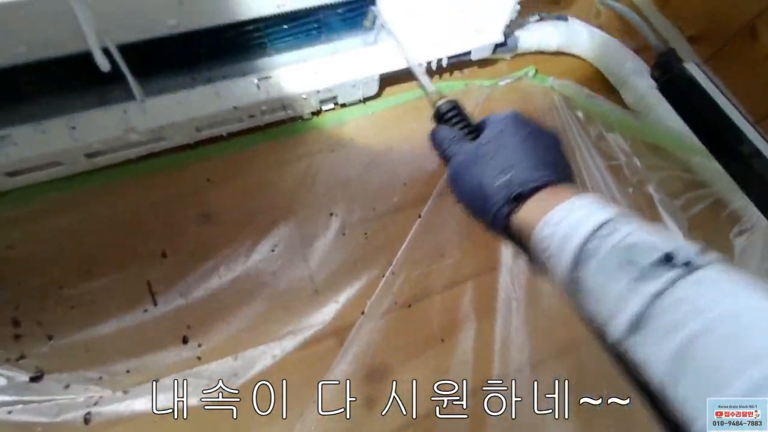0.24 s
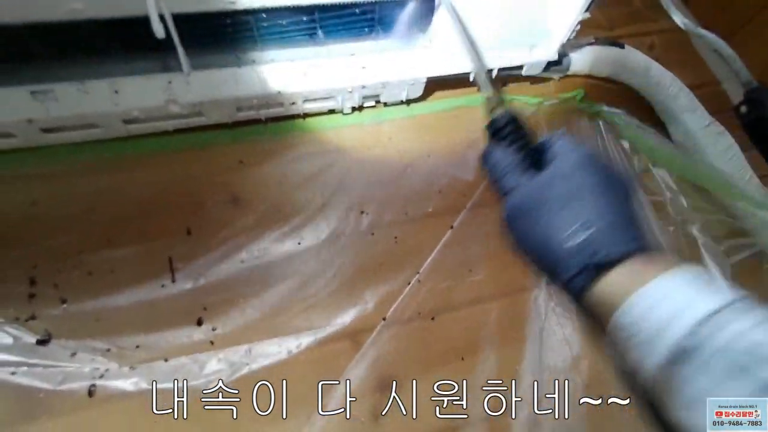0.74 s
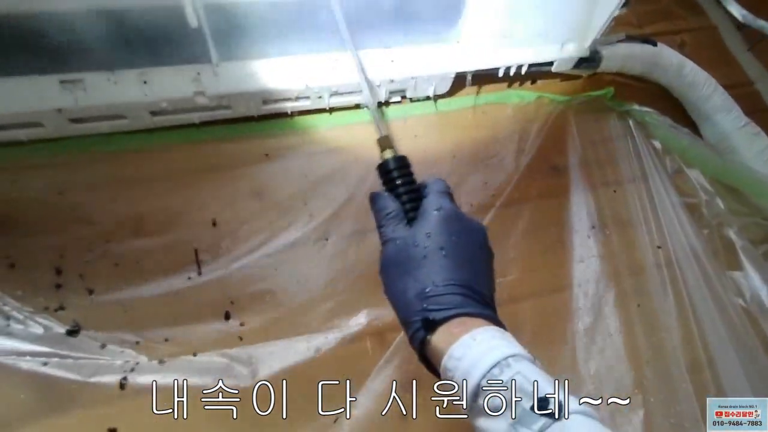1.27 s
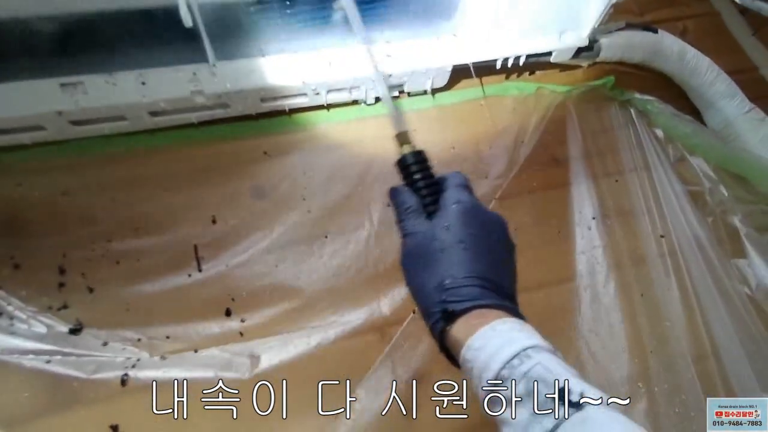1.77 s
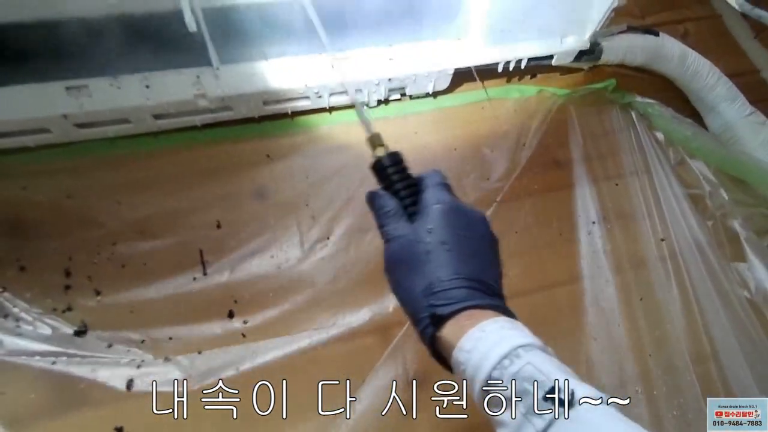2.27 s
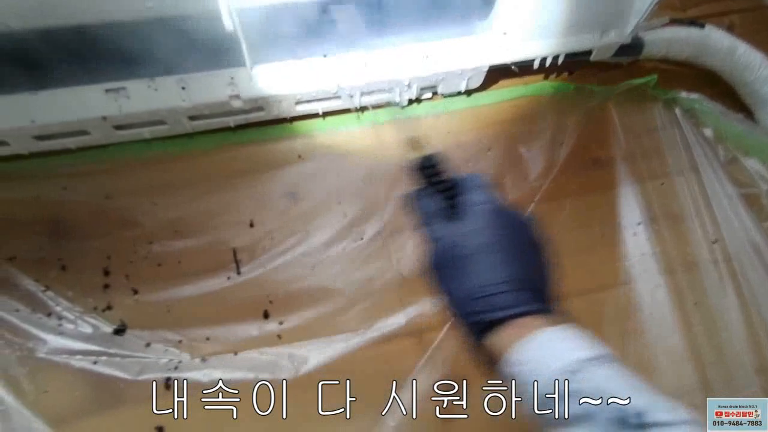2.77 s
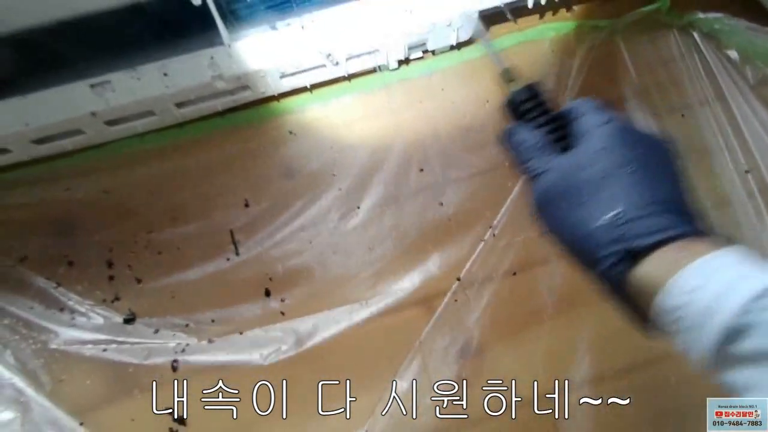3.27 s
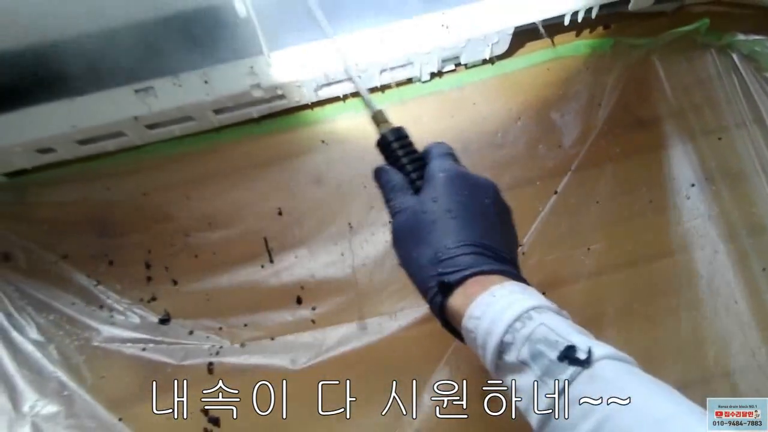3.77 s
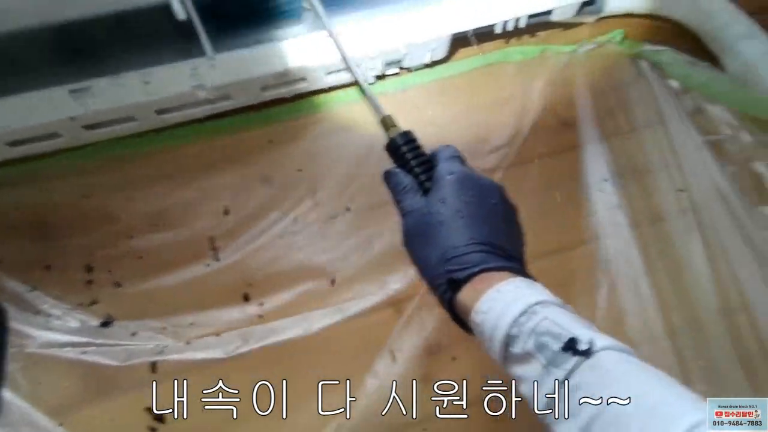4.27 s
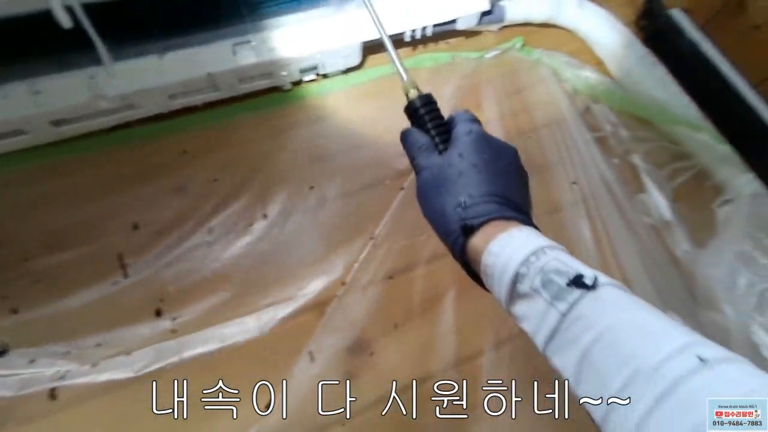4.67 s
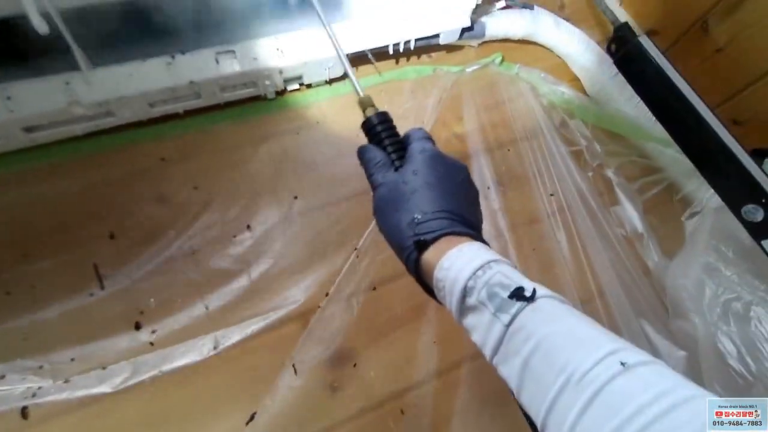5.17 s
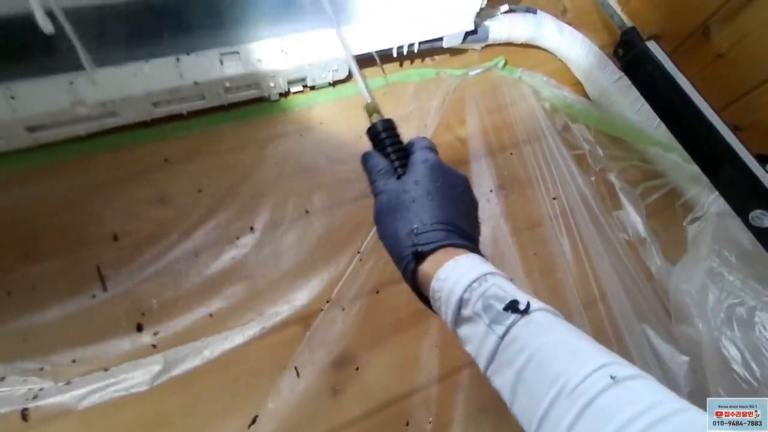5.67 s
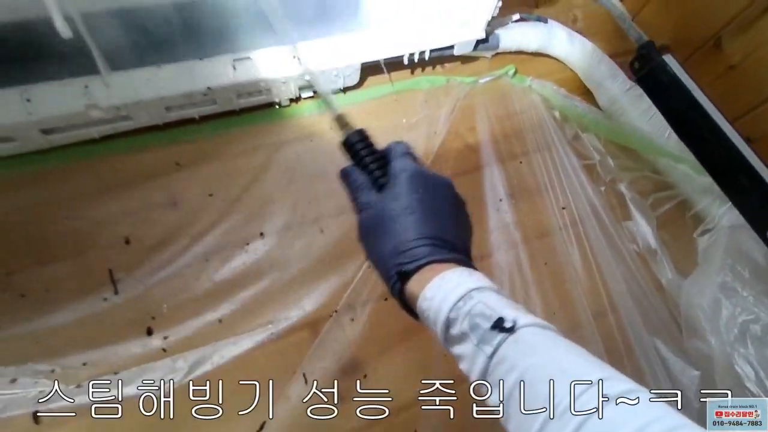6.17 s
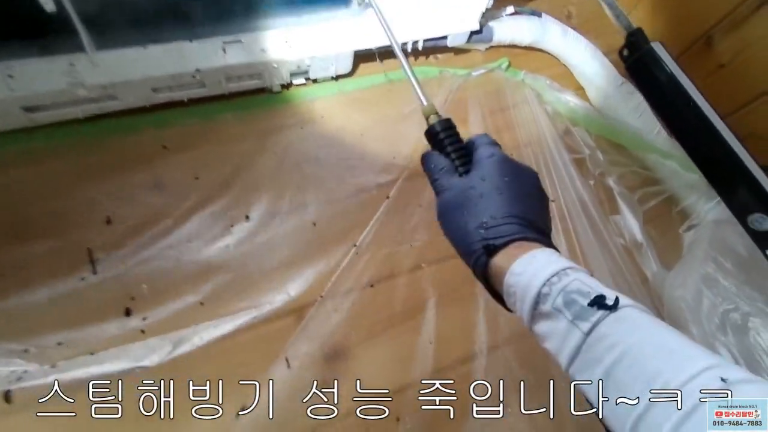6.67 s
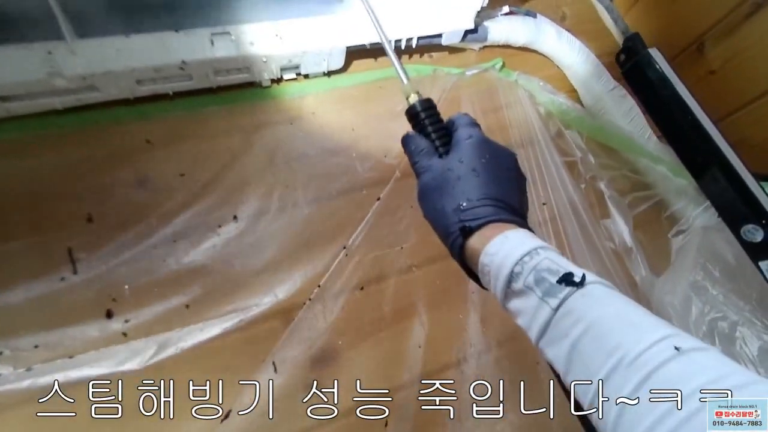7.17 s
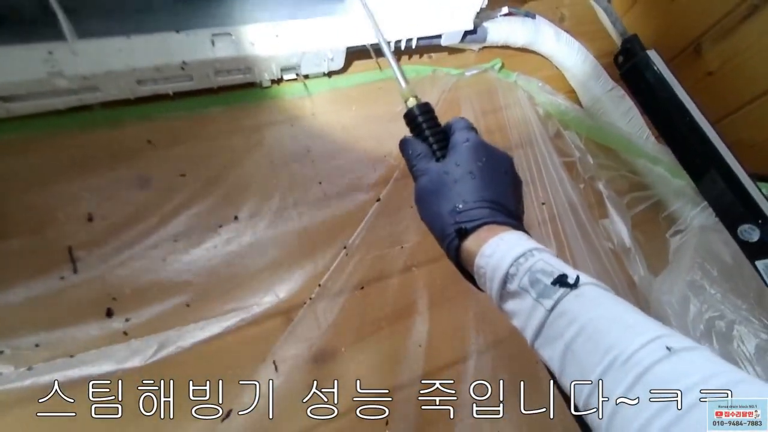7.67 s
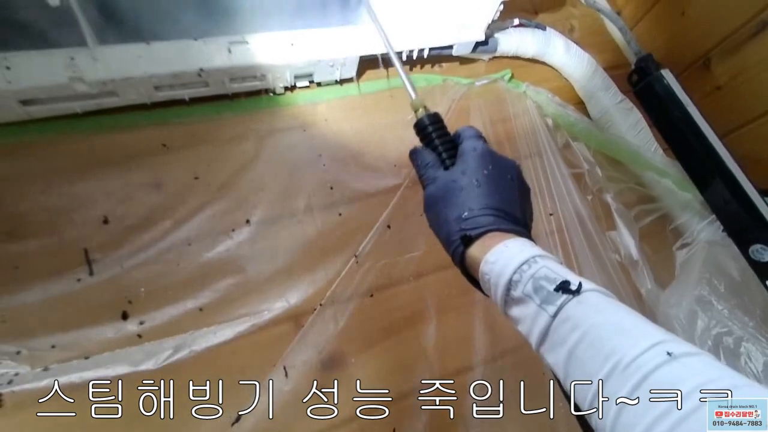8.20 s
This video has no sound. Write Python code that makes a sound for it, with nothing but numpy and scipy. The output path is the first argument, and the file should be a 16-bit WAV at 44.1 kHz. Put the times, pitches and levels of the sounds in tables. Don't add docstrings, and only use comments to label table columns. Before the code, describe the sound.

A pressurised steam nozzle blows without pause into the fins of a wall-mounted air conditioner in a small room. The bright, dense hiss flutters and shifts colour as the nozzle moves. Wet splatter and crackling drops ride on it, with sharp spits early, around three seconds, and often after five. A faint low hum is buried below. Very close stereo microphone, nearly overloaded.

```python
import sys
import numpy as np
from scipy import signal
from scipy.fft import rfft, irfft, next_fast_len
from scipy.io import wavfile
from scipy.ndimage import uniform_filter1d, map_coordinates

SR = 44100
rng = np.random.default_rng(int(sys.argv[2]) if len(sys.argv) > 2 else 0)


def dump(signal):
    limited = np.clip(np.atleast_2d(signal).T, -1, 1)
    pcm = np.round(limited * 32767).astype(np.int16)
    wavfile.write(sys.argv[1], SR, pcm)


def elevation(decibels):
    levels = np.asarray(decibels, float)
    return 10 ** (levels / 20)


N = 372204
SIZE = next_fast_len(N)
HZ = np.arange(SIZE // 2 + 1) * SR / SIZE + 1e-3
TIME = np.arange(N) / SR

# frequency in Hz, level in dB rms.
HUM = [
    (60, -91),
    (120, -52.5),
    (180, -43.5),
]

# time in seconds, level in dB.
WETNESS = [(0, -38), (.6, -35), (1.3, -37.5), (1.7, -39.5), (1.87, -33), (2.05, -37.5), (2.87, -39),
           (2.97, -33), (3.4, -35.5), (3.6, -37.5), (3.85, -38), (4.1, -36.5), (6.5, -37), (7, -34),
           (7.8, -32), (8.1, -36), (8.25, -32), (8.44, -32)]

# frequency in Hz, density in dB per Hz.
SPRAY_COLOUR = [(20, -8.5), (100, -1), (250, -5.5), (330, -1.5), (500, -1), (750, -2), (980, -4),
                (1500, -3), (4000, -1.5), (9000, -1.5), (15700, 0.5)]

# start in seconds, peak in dB.
SPITS = [(0.551, -22), (0.63, -18.5), (3.839, -26), (.98, -25), (1.27, -29), (2.927, -24), (2.98, -33),
         (3.014, -22.5), (3.24, -21), (3.382, -22), (3.811, -22.5), (7.497, -23), (4.559, -28),
         (5.001, -24), (5.105, -27), (5.297, -19.5), (5.623, -24), (6.181, -24), (6.273, -24), (6.554, -29),
         (6.668, -19), (7.017, -19.5), (7.301, -25.5), (7.442, -22.5), (3.356, -26), (7.639, -17),
         (7.793, -23), (7.921, -22.5), (8.198, -26), (8.402, -25.5)]

# frequency in Hz, density in dB per Hz.
SPIT_COLOUR = [(30, -6), (300, -3.5), (1000, 1.5), (3000, 0), (8000, -4.5), (15700, -7)]

# centre in seconds, frequency in Hz, bandwidth in Hz, level in dB rms, length in seconds.
WHISTLES = [(0.14, 5300, 150, -33, 0.45), (1.4, 3800, 90, -66, 0.14), (3.95, 3600, 49, -31, 0.12),
            (.8, 15000, 90, -28, .15), (18, 9700, 90, -29, .2), (6.15, 4200, 520, -31, 0.69),
            (7.19, 1980, 110, -22.5, 0.046), (2.12, 3530, 520, -34, 1.2), (4.2, 3420, 260, -26.5, 0.22),
            (1.13, 1395, 160, -35.5, 2.3), (6.75, 2500, 520, -32, 0.63), (7.7, 2580, 560, -30.5, 1.6),
            (7.97, 1690, 200, -36, 0.52)]

# time in seconds, level in dB.
FLOW = [(0, -18), (.45, -19), (.78, -14.5), (1.1, -15.3), (1.5, -16), (2.6, -16), (2.8, -17.5),
        (3.5, -15.5), (3.65, -16), (4.4, -16.5), (4.68, -17.5), (4.78, -14), (4.95, -16.5), (5.3, -16),
        (6.0, -15.3), (6.7, -17), (8.25, -13.5), (8.44, -18.5)]

# centre in seconds, length in seconds, centre in Hz, spread in
# octaves, change in dB.
SHADING = [(.28, 0.59, 5060, 0.47, -6.5), (0.71, 0.18, 5000, 0.88, -5), (1.27, .15, 6500, 0.81, 2),
           (2.356, 0.15, 9500, 0.56, -3), (2.55, .2, 5000, 0.62, 1.5), (2.88, 0.39, 5000, 0.58, -1),
           (3.15, 0.23, 1790, 0.63, 5), (3.95, .3, 9600, 0.25, 3.5), (4.227, .1, 9500, .5, -3.5),
           (4.3, 0.11, 6500, 0.6, 5), (4.495, 0.36, 4900, 0.97, -4), (5.04, 0.32, 4900, .6, 4.5),
           (6.12, 0.096, 9500, .5, -0.5), (6.455, 0.46, 5000, .7, 0.5), (6.78, .35, 5500, 0.81, -4.5),
           (7.2, .4, 4000, 0.93, 1.5), (.45, 0.22, 1800, 0.57, 5), (.46, .14, 4200, 0.2, -2),
           (2.0, 1.8, 945, 0.17, -6), (4.0, 0.39, 2810, .25, -4), (1.0, 0.35, 5630, .3, -5),
           (4.9, 0.38, 9000, .4, -2), (5.45, 0.76, 3170, 0.54, 2), (2.556, 0.27, 1630, 0.2, 5.5)]

# frequency in Hz, density in dB per Hz.
NOZZLE_TOP = [(11000, -2.5), (13000, -1.5), (15000, .5), (15800, .8)]

# frequency in Hz, density in dB per Hz.
JET_COLOUR = [(410, -44), (700, -27.5), (1130, -15), (1400, -7), (2000, -9.0), (2400, -9), (3500, -9.0),
              (4500, -9.5), (6400, -7.5), (8400, -6.0)] + NOZZLE_TOP

# time in seconds, extra path in milliseconds, strength from 0 to 1.
CASING = [(0, .6, .3), (.4, .64, .18), (.8, .72, .09), (1, .62, .08), (1.4, .67, .22), (1.8, .66, .15),
          (2.6, .67, .17), (2.8, .54, .08), (3.2, .73, .1), (3.45, .72, .09), (3.8, .55, .11),
          (4.1, .55, .22), (4.4, .6, .14), (4.8, .55, .17), (6.3, .55, .28), (6.8, .57, .08),
          (7.2, .55, .27), (8.44, .55, .21)]

# delay in milliseconds, signed share of the casing bounce.
FINS = [(.35, -0.23), (.96, -0.26), (1.13, 0.22), (1.3, 0.051), (1.78, -0.23), (2.38, 0.25)]

# frequency in Hz, lead of the left port in radians.
PORT_PHASE = [(0, 0.55), (8270, -0.45), (10200, -0.89), (11500, -0.68), (15500, -0.74), (15800, -0.6),
              (16600, -0.4)]


def rms_one(x):
    return x / np.sqrt(np.mean(x ** 2) + 1e-20)


def in_time(rows):
    s, *columns = np.transpose(rows)
    return [np.interp(TIME, s, column) for column in columns]


def on_hz(points):
    hz, value = np.transpose(points)
    return np.interp(np.log(HZ), np.log(hz + 1), value)


def drift(rate_hz):
    coarse = 32
    r = np.exp(-2 * np.pi * rate_hz * coarse / SR)
    noise = rng.standard_normal(N // coarse + 2002)
    slow = signal.lfilter([1], [1, -2 * r, r * r], noise)[2000:]
    return np.interp(np.arange(N) / coarse, np.arange(len(slow)), rms_one(slow))


def noise_spectrum(colour, lo_hz, hi_hz, channels):
    spectrum = rfft(rng.standard_normal((channels, SIZE))) * elevation(on_hz(colour))
    inside = (HZ > lo_hz) & (HZ < hi_hz)
    power = 2 * np.sum(abs(spectrum[:, inside]) ** 2) / channels
    return spectrum * SIZE / np.sqrt(power)


def part_alike(spectrum, alike):
    mid, side = spectrum
    return np.sqrt((1 + alike) / 2) * mid + np.sqrt((1 - alike) / 2) * side * np.array([[1], [-1]])


def fluttering(spectrum, level_db, shared_db, near_db, own_db, count):
    low_hz, ratio = 150, 16000 / 150
    place = np.log(HZ / low_hz) / np.log(ratio) * (count - 1)
    place = np.clip(place, 0, count - 1)
    out, near = 0, drift(22)
    for k in range(count):
        near = .35 * near + .93 * drift(65)
        band = irfft(spectrum * np.clip(1 - abs(place - k), 0, 1), SIZE)[:, :N]
        hz = low_hz * ratio ** (k / (count - 1))
        gain_db = level_db(hz) + shared_db + near_db * near + own_db * drift(5.3)
        out = out + band * elevation(gain_db)
    return out


def late(x, ms):
    return map_coordinates(x, [np.arange(N) - ms * SR / 1000], order=3)


def hum():
    out = np.zeros(N)
    for hz, db in HUM:
        level = np.sqrt(2) * elevation(db + 2.1 * drift(7.9))
        phase = 2 * np.pi * (hz * TIME + rng.random()) + 0.9 * drift(6.4)
        out += level * np.sin(phase)
    return out


def spray_level():
    gather_s, drain_s = 0.016, 0.026
    power = elevation(in_time(WETNESS)[0]) ** 2
    for s, db in SPITS:
        away = np.where(TIME < s, (s - TIME) / gather_s, (TIME - s) / drain_s)
        splash_db = -33.5 + 0.24 * (db + 21)
        power = power + elevation(splash_db) ** 2 * np.exp(-np.minimum(away, 6) ** 2)
    return 10 * np.log10(power)


def spray(surge):
    spray_db = spray_level()
    mean_db = np.mean(spray_db)
    alike = np.interp(HZ, [100, 400, 3000], [.6, .4, .1])
    wash = part_alike(noise_spectrum(SPRAY_COLOUR, 170, 1510, channels=2), alike)

    def level_db(hz):
        return mean_db + min(1, hz / 300) * (spray_db - mean_db)

    return fluttering(wash, level_db, 0.65 * surge, near_db=2.33, own_db=1.43, count=10)


def droplets():
    spray_db = spray_level()
    per_second = 90 * elevation(2.0 * (spray_db - np.mean(spray_db)))
    hit = rng.random(N) < per_second / SR
    size = elevation(-19.5 + 6.4 * np.minimum(rng.exponential(1, N), 3))
    size = size * rng.choice([-1, 1], N, p=[.75, .25])
    side = elevation(3 * rng.standard_normal(N) * np.array([[1], [-1]]))
    band = signal.butter(1, [500, 7000], "band", fs=SR, output="sos")
    return signal.sosfilt(band, hit * size * side + 1e-18)


def spits():
    spit_s, dribble_s, dribble_db = 0.00586, 0.0144, -9
    gate = np.zeros(N)
    chances = rng.uniform(0.576, 1.37, (len(SPITS), 2))
    for (s, db), (stretch, wait) in zip(SPITS, chances):
        length = max(int(stretch * spit_s * SR), 40)
        window = signal.windows.tukey(length, .4)
        for start_s, change_db in ((s, 0), (s + wait * dribble_s, dribble_db)):
            start = round(start_s * SR)
            burst = elevation(db + change_db - 5.0) * window
            gate[start:start + length] += burst[:max(N - start, 0)]
    drops = uniform_filter1d(rng.standard_normal(N), size=16) * 4
    gate *= elevation(3 * drops - 2)
    hiss = part_alike(noise_spectrum(SPIT_COLOUR, 250, 755, channels=2), 0.78)
    return gate * irfft(hiss, SIZE)[:, :N]


def whistles():
    out, air = np.zeros(N), rng.standard_normal(N)
    for s, hz, width_hz, db, length in WHISTLES:
        r = np.exp(-np.pi * width_hz / SR)
        poles = [1, -2 * r * np.cos(2 * np.pi * hz / SR), r * r]
        near = abs(TIME - s) < 1.5 * length
        tone = rms_one(signal.lfilter([1], np.convolve(poles, poles), air[near]))
        swell = np.exp(-((TIME[near] - s) / (.5 * length)) ** 2)
        out[near] += elevation(db) * swell * tone
    return out


def jet_level():
    flow_db, = in_time(FLOW)
    mean_db = np.mean(flow_db)
    passes = []
    for s, length, hz, octaves, db in SHADING:
        passes.append((hz, octaves, db * np.exp(-((TIME - s) / (.5 * length)) ** 4)))
    low, high = drift(4), drift(4)
    roar_follows = 0.45

    def level_db(hz):
        bright = np.interp(np.log2(hz), np.log2([2000, 10000]), [0, 1])
        swing = (roar_follows + (1 - roar_follows) * bright) * (flow_db - mean_db)
        shade = sum(np.exp(-(np.log2(hz / centre) / octaves) ** 2) * db for centre, octaves, db in passes)
        wobble = 0.39 * (bright * high + (1 - bright) * low)
        return mean_db - 1.5 + swing + shade + wobble

    return level_db


def scattered(direct, strength, count):
    mid, side, power = direct.copy(), np.zeros(N), np.ones(N)
    lags = np.geomspace(45, 400, count) * rng.uniform(.9, 1.1, count)
    leans = rng.normal(0, 0.38, count)
    for lag, lean in zip(lags, leans):
        gain = strength * drift(3)
        path = gain * np.roll(direct, int(lag))
        mid += path
        side += lean * path
        power += gain ** 2
    side = signal.sosfilt(signal.butter(4, 9500, "high", fs=SR, output="sos"), side)
    return (mid + side * np.array([[1], [-1]])) / np.sqrt(power)


def jet(surge):
    steam = noise_spectrum(JET_COLOUR, 11500, 15500, channels=1) * (HZ > 700)
    direct = fluttering(steam, jet_level(), .55 * surge, near_db=1.6, own_db=.5, count=20)[0]
    path_ms, strength = in_time(CASING)
    strength = 1.26 * strength
    dull = signal.sosfilt(signal.butter(1, 9000, fs=SR, output="sos"), direct)
    lead_ms = .016
    bounce = late(dull, path_ms - lead_ms)
    bounce -= 0.45 * np.roll(bounce, 4)
    for ms, share in FINS:
        bounce += share * np.roll(dull, round((ms - lead_ms) * SR / 1000))
    coloured = (direct + strength * bounce) / np.sqrt(1 + strength ** 2)
    heard = elevation(0.9) * scattered(coloured, strength=0.17, count=16)
    turn = np.exp(.5j * np.outer([1, -1], on_hz(PORT_PHASE)))
    return irfft(rfft(heard, SIZE) * turn, SIZE)[:, :N]


def scene():
    surge = .3 * drift(25) + .7 * drift(60)
    return hum() + spray(surge) + droplets() + spits() + whistles() + jet(surge)


def low_pass(x):
    return signal.sosfilt(signal.butter(12, 15750, fs=SR, output="sos"), x)


def record(dry):
    x = irfft(rfft(dry, SIZE) * (HZ < 15720), SIZE)[:, :N]
    offset = .0019
    return low_pass(np.clip(x + offset, -1, 1))


dry = scene()
out = record(dry)
dump(out)
```